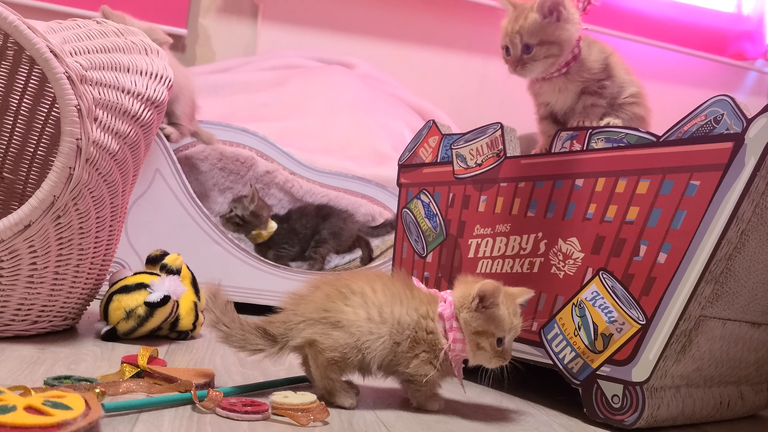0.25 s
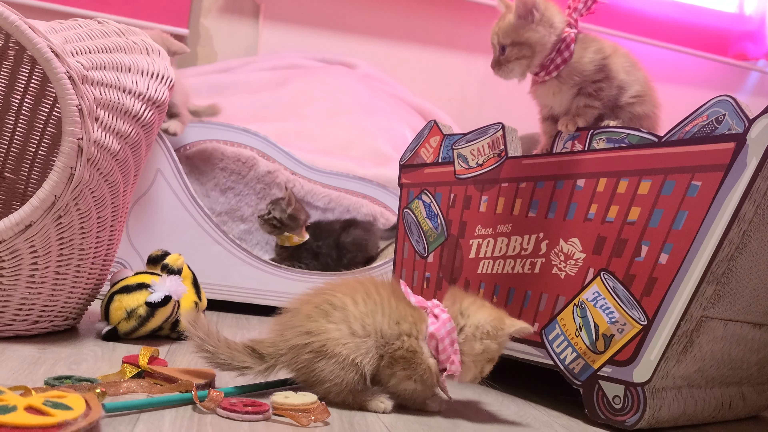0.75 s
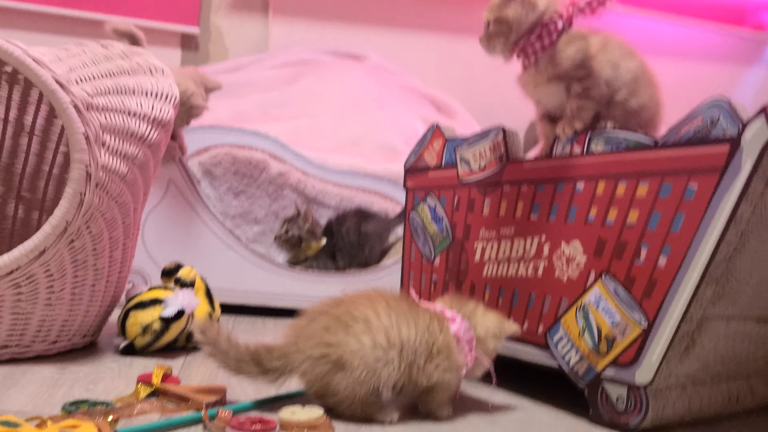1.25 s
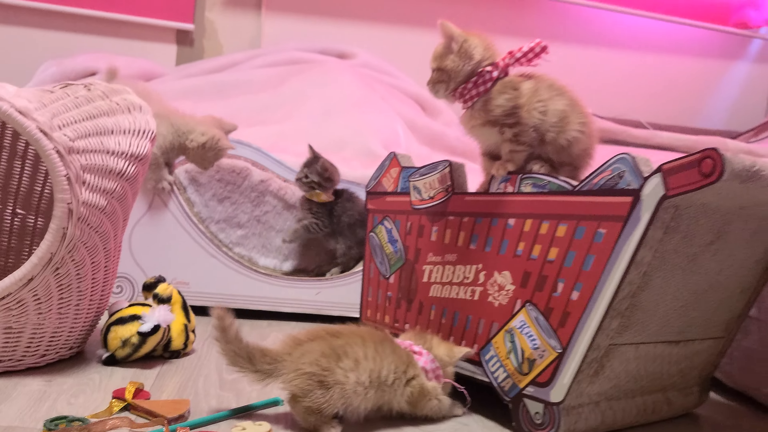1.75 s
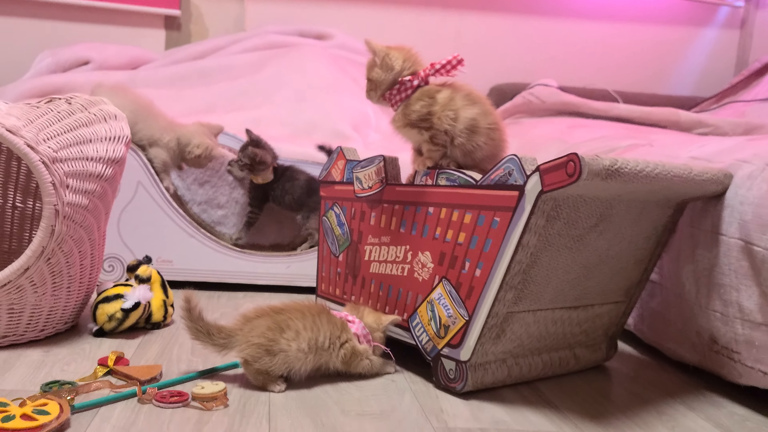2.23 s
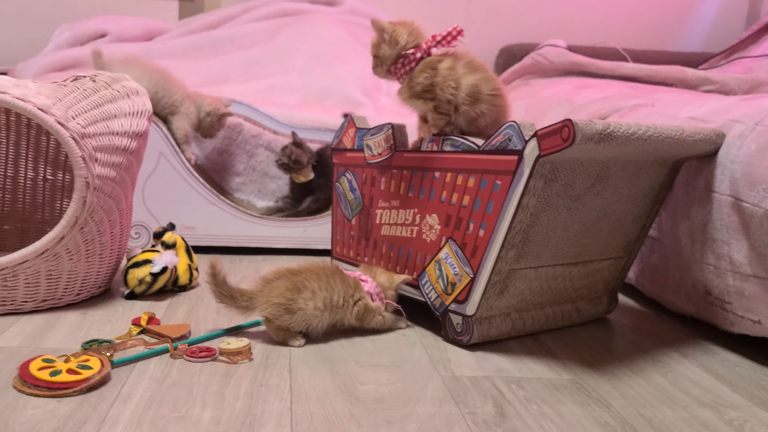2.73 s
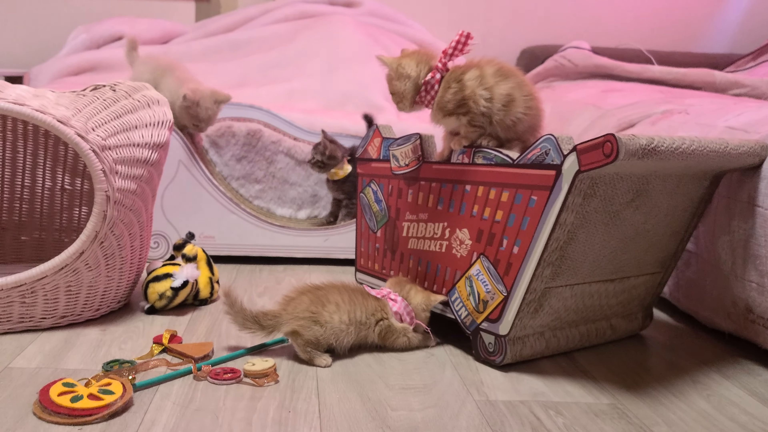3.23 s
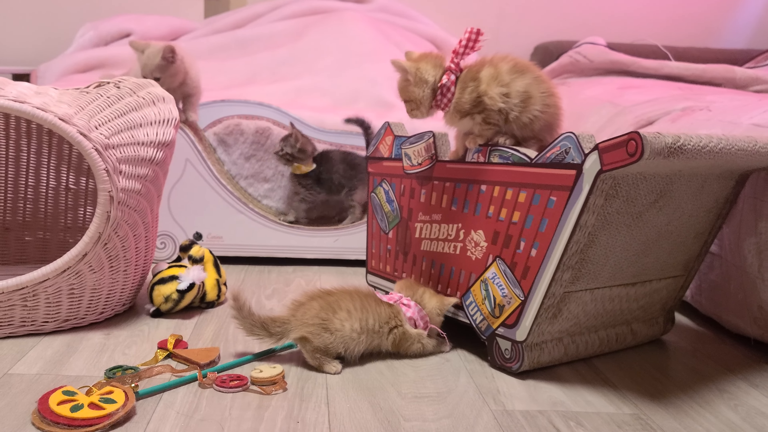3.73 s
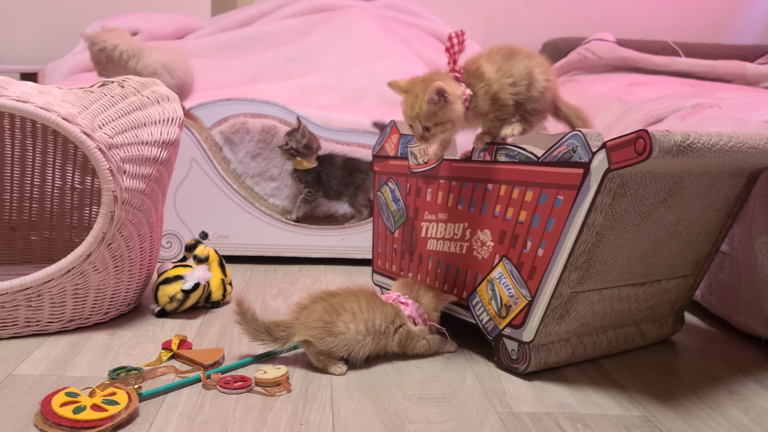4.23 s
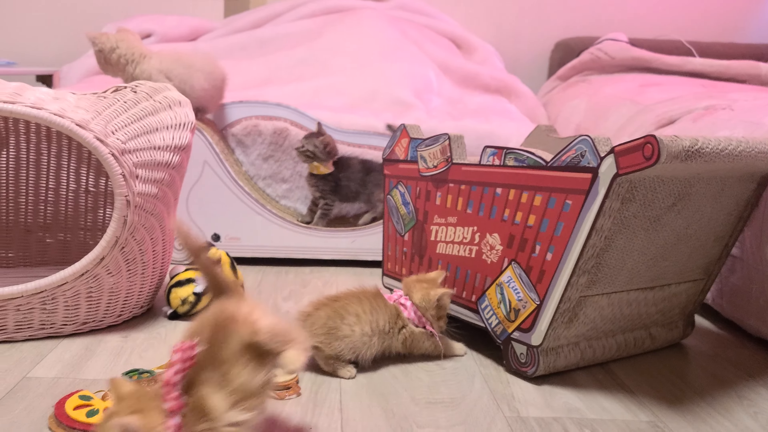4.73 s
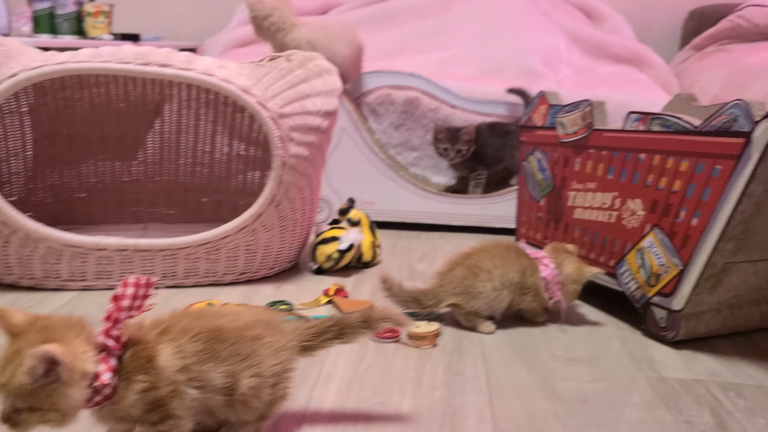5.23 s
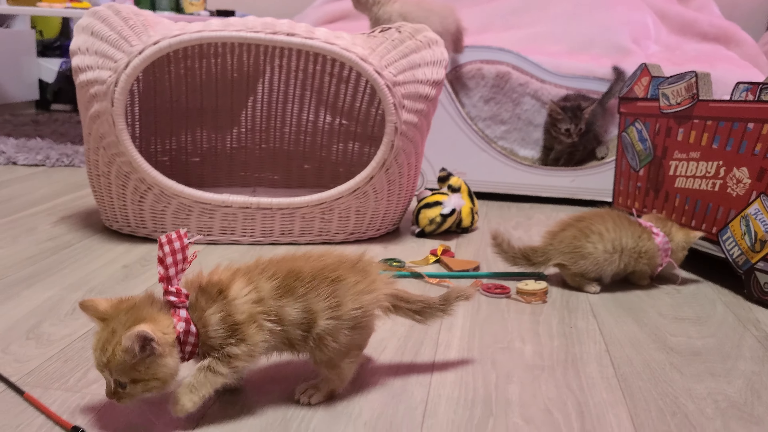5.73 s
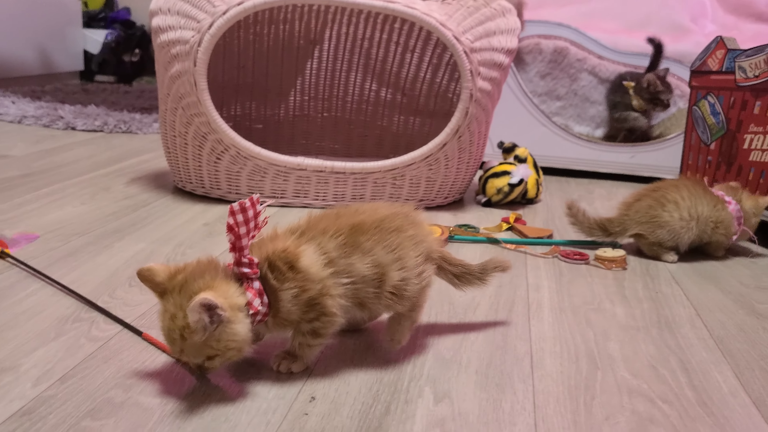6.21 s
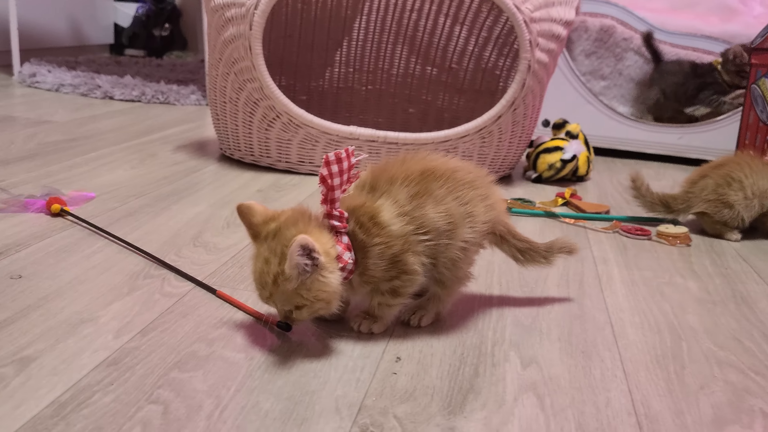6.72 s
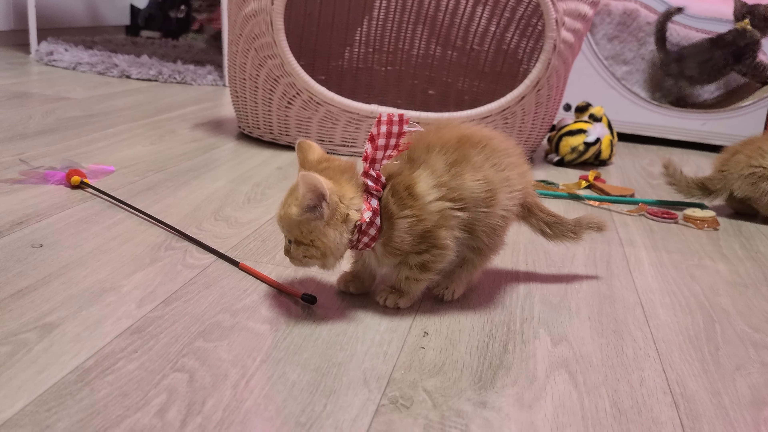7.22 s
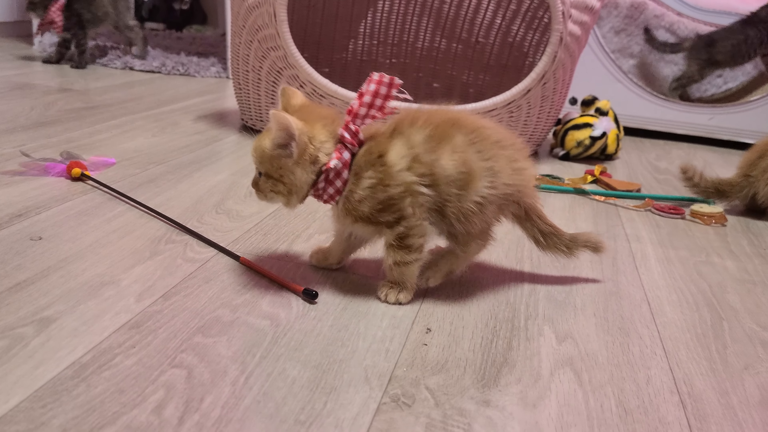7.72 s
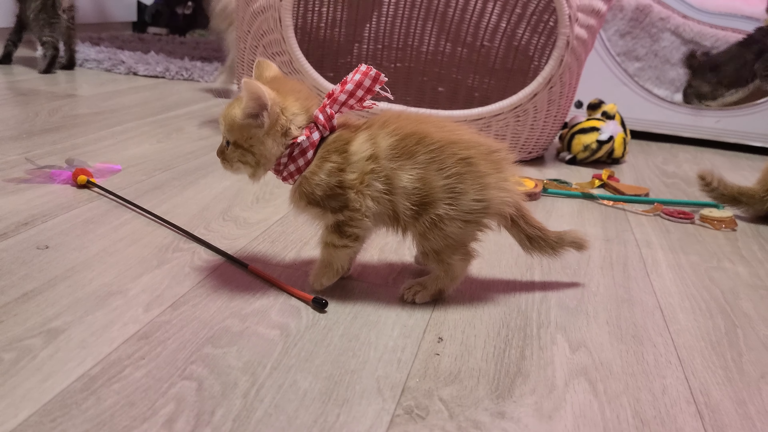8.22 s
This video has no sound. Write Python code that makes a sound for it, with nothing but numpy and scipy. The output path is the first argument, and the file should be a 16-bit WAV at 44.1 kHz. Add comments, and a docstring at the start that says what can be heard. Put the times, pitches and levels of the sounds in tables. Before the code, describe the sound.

A quiet indoor room with a faint, steady appliance hum and low rumble. From about 0.7 to 4 seconds, kittens' claws tick and scratch lightly on cardboard and wicker, mostly to the right. Close, dry handling noises reach the microphone almost only on the right: faint grip creaks early on, a loud knock at 1.5 seconds, a small finger judder at 2.7 and another knock at 3.3. Around 4.6 seconds a kitten lands on the wooden floor with a few soft thuds and toy clicks, and a small bell tinkles briefly and faintly at 4.8. From 6.1 to 6.8 seconds come four loud, sharp taps on the microphone's housing, with a light scratch among them, followed by quicker, weaker taps that fade by 7.6. Three quick, soft paw thumps on the boards arrive at about 8.3 seconds.

```python
"""Camera taps and kittens at play

Sharp taps on a hand-held camera's housing reach almost only its right microphone, by conduction.
Kittens play on a wooden floor: claws tick and rasp on a cardboard scratcher and wicker, one kitten
jumps down among toys and sets the boards swinging, and a small bell tinkles in its free modes.
A quiet appliance hums under the broadband noise of the room."""
import sys
import numpy as np
from scipy import signal
from scipy.fft import rfft, irfft, next_fast_len
from scipy.io import wavfile
from scipy.ndimage import map_coordinates

SR = 44100
rng = np.random.default_rng(int(sys.argv[2]) if len(sys.argv) > 2 else 0)


def log_audio(samples):
    """Write samples as a 16-bit WAV file to the path given in sys.argv[1]."""
    # one column per channel
    frames = np.atleast_2d(samples).T
    # limit to full scale, then quantise
    limited = np.clip(frames, -1, 1)
    pcm = np.round(limited * 32767).astype(np.int16)
    wavfile.write(sys.argv[1], SR, pcm)


N = 373086

# Transmission through the housing: f/Hz, level/dB
HOUSING_RESPONSE = [(40, -18), (110, -1.5), (210, 5.5), (480, 3.5), (1000, -5), (1700, -8.5), (2500, -15),
                    (3500, -15), (5500, -21), (16000, -14)]
def tap(sharp_hz, bass_share=.058):
    """Impact: a softer contact lasts longer, which lowers the cutoff sharp_hz of its pulse."""
    uneven = lambda hz: ripple(hz, spacing_hz=500) * np.minimum(hz / 2000, 1.5)
    bass_loss = lambda hz: np.hypot(1, bass_share * sharp_hz / (hz + 50))
    pulse = impulse(lambda hz: amp(along(HOUSING_RESPONSE, hz) + uneven(hz)) / bass_loss(hz))
    pulse = np.pad(pulse, (SR // 500, 0))  # 2 ms of room for the onset
    return peaked(filtered(pulse, lambda hz: 1 / np.sqrt(1 + (hz / sharp_hz) ** 5)))


# A finger juddering on the housing: t/s, level/dB, slip period/s
FINGER_JUDDERS = [(1.051, -41, .0158), (2.7132, -25.5, .0138)]
def judders(spread_s=.001, spread_db=2.5, sharp_hz=680, ring_db=-19.5):
    """Stick-slip: each judder yields four soft, nearly evenly spaced contacts."""
    return [(s + k * gap + spread_s * late, db + spread_db * size, sharp_hz, ring_db)
            for s, db, gap in FINGER_JUDDERS
            for k, (late, size) in enumerate(rng.uniform(-1.1, 1, (4, 2)))]


# Taps on the housing, and two soft paw bumps at 1.87 s and 2.45 s: t/s, level/dB, contact cutoff f/Hz, relative
# ring level/dB
HOUSING_TAPS = [(1.1574, -27, 7000, -9.5), (1.5034, -5, 1340, -6.5), (1.8737, -40, 700, -28),
                (2.4455, -41, 700, -30), (3.2562, -11, 1130, -25), (6.0666, -6, 3080, -13),
                (6.224, -5.5, 2980, -18), (6.341, -5.5, 3300, -13.5), (6.8143, -6, 3030, -11.5),
                (6.956, -15, 3760, -16.5), (7.0354, -17.5, 4900, -16), (7.158, -16, 7260, -17),
                (7.1943, -29, 1820, -28), (7.298, -18, 6150, -26), (7.534, -35, 4130, -12),
                (7.5384, -25, 3130, -16), (7.6397, -30, 6900, -30)]
# High resonances of the housing: f/Hz, level/dB
RING_SPECTRUM = [(1500, -20.5), (2700, -5.5), (3500, -4), (5500, -28), (7000, -11), (9500, -11.5),
                 (11000, -7.5), (11900, 1), (13000, -13.5), (15500, -15)]
def housing(ring_t60=.0057, settle_t60=.05, lead_in_db=-21, settle_db=-25, creak_db=-52, leak_db=-48):
    """Structure-borne sound: each tap reaches the right microphone as the housing rings and settles."""
    out = np.zeros(N)
    ring = lambda hz: amp(along(RING_SPECTRUM, hz))
    for s, db, sharp_hz, ring_db in HOUSING_TAPS + judders():
        muffled = lambda hz: amp(along(HOUSING_RESPONSE, hz)) / (1 + (hz / sharp_hz) ** 2)
        add(out, s - 1 / 500, amp(db) * tap(sharp_hz))
        add(out, s, amp(db + ring_db + 1) * burst(ring, ring_t60)[0])
        # a faint, muffled lead-in just before each tap
        add(out, s - .00126, amp(db + lead_in_db) * burst(muffled, ring_t60)[0])
        add(out, s, amp(db + settle_db) * burst(muffled, settle_t60)[0])
    creak = tap(sharp_hz=680)
    for when, size in rng.random((45, 2)):  # the grip creaks faintly for the first 2.7 s
        add(out, 2.7 * when, amp(creak_db + 3.34 * size) * creak)
    return out * amp([[leak_db], [0]])


# Claw ticks and toy clicks: t/s, level/dB, f/Hz, left minus right/dB, T60/s
CLAW_TICKS = [(.724, -52, 5030, -7, 0.0099), (0.8656, -41.5, 1420, -1.5, 0.062),
              (1.1, -36, 5770, -11, .018), (1.156, -23, 2060, -24, 0.0037), (1.188, -31.5, 5520, -7, .02),
              (1.565, -38.5, 5660, -16, 0.041), (1.576, -34.5, 5800, -15, 0.013),
              (1.612, -38.5, 6170, -12, 0.012), (1.659, -36.5, 5500, -17, 0.016),
              (1.797, -42, 5700, -11, 0.086), (1.9205, -42, 4500, -3, 0.024),
              (1.96, -31.5, 6700, -10, .022), (2.184, -45, 5550, -9, 0.013), (3.32, -35, 3130, -4, 0.038),
              (3.411, -33.5, 4400, -7, 0.031), (3.439, -44, 5950, -10, 0.017),
              (3.534, -36.5, 2170, -3, .045), (3.6, -36.5, 5300, -15, 0.025),
              (3.774, -44.5, 5500, -20, 0.031), (3.819, -38.5, 2950, 0, 0.02),
              (3.944, -46, 5500, -11, 0.053), (3.995, -40.5, 5340, -7, 0.061),
              (4.028, -31.5, 5700, -2.5, 0.0052), (4.425, -46, 4110, -16, 0.055),
              (4.454, -34, 3370, -9, 0.031), (4.588, -38.5, 3100, -13, 0.022),
              (4.6926, -22.5, 4620, -5, 0.0065), (4.696, -38, 2200, 10, 0.01),
              (4.717, -29, 3840, -13, 0.016), (4.72, -33.5, 2250, -14, 0.024)]
# Spectral envelope of a tick: f/Hz, level/dB
TICK_SPECTRUM = [(300, 0.5), (1200, 3.5), (3000, -2.5), (6300, 2.5), (8000, -14.5), (12500, -19.5),
                 (16000, -16)]
def claws(level_db=-2, hump_db=7, ripple_db=4.5, ring_t60=.076):
    """Plucking: a spot caught and released radiates little far below its pitch and rings on hollowly."""
    out = np.zeros((2, N))
    for s, db, pitch_hz, pan_db, t60 in CLAW_TICKS + catches():
        ring_db = -15.5 + 8 * np.log2(t60 / .018)  # a freer spot rings more
        ring = amp(ring_db) * burst(lambda hz: resonance(hz, pitch_hz, width=.17), ring_t60)
        hump = lambda hz: hump_db * resonance(hz, pitch_hz, width=.11)
        spot = lambda hz: hump(hz) + ripple_db * ripple(hz, spacing_hz=263)
        bass_loss = lambda hz: 1 + (.33 * pitch_hz / (hz + 1)) ** 2
        tick = burst(lambda hz: amp(along(TICK_SPECTRUM, hz) + spot(hz)) / bass_loss(hz), t60)
        add(out, s, amp(db + level_db) * panned(pan_db) * (tick + ring))
    return out


# Claws and fur dragged over cardboard: hardest pull t/s, swell/s, hiss level/dB, rasp level/dB
SCRATCH_STROKES = [(.22, 0.045, -70, -77), (0.729, 0.048, -64.5, -70), (.872, .008, -56.5, -72),
                   (1.161, .068, -49.5, -59.5), (1.57, 0.0949, -53.5, -57.5), (1.922, 0.0022, -44.5, -82),
                   (1.965, .005, -55, -82), (2.31, 0.17, -60.5, -66.5), (2.661, 0.041, -56.5, -59.5),
                   (3.445, 0.035, -51.5, -63), (3.826, 0.011, -53, -52), (4.03, 0.0044, -51, -75),
                   (4.722, 0.024, -71, -44), (4.81, 0.061, -52.5, -80), (6.535, 0.064, -48, -61.5),
                   (7.64, 0.096, -67.5, -65.5)]
# Spectral densities of the high hiss and the lower rasp: f/Hz, level/dB
HISS_SPECTRUM = [(1000, -83), (2000, -36.5), (3500, -9), (5000, -0.5), (6300, 5), (8000, -8.5),
                 (10000, -7.5), (12200, -8), (14000, -24), (16000, -27.5)]
RASP_SPECTRUM = [(150, -56), (600, -25.5), (1200, 12), (2100, 8.5), (3300, 7.5), (5000, -19), (10000, -50)]
GRIP_PER_SWELL = .5  # a stroke first takes hold for this share of its swell
def scratching(hiss_db=-3, rasp_db=-5, grain_db=3, dull_below_db=-49, dull_hz=6500):
    """Friction noise: dragged claws jerk from fibre to fibre, and each stroke meets other resonances."""
    out = np.zeros((2, N))
    jerks = unit(amp(grain_db * wobble(500) + wobble(43)))
    hiss = jerks * noise(HISS_SPECTRUM) * panned(db=-13)
    rasp = jerks * noise(RASP_SPECTRUM) * panned(db=.5)
    for s, swell, high_db, low_db in SCRATCH_STROKES:
        start = max(round((s - swell - GRIP_PER_SWELL * swell) * SR), 0)
        i = np.arange(start, round(s * SR) + SR // 3)
        friction = amp(hiss_db + high_db) * hiss[:, i] + amp(rasp_db + low_db) * rasp[:, i]
        drag = pull(i / SR - s, swell) * friction
        dull_db = .7 * min(high_db - dull_below_db, 0)  # a weak stroke loses treble
        drag = filtered(drag, lambda hz: amp(dull_db * np.clip(hz / dull_hz - 1, 0, 1) ** .5))
        add(out, start / SR, filtered(drag, lambda hz: amp(1.6 * ripple(hz, spacing_hz=150))))
    return out


def pull(t, swell, swell_db=9):
    """Amplitude envelope: a stroke grips, grows exponentially to its hardest pull at t = 0, and decays."""
    grip = np.clip((t + swell) / (GRIP_PER_SWELL * swell) + 1, 0, 1) ** 2
    release_s = .055 + .43 * swell  # a slow stroke also lets go slowly
    return grip * amp(np.minimum(swell_db * t / swell, -20 * t / release_s))


def catches(centre_hz=5110, pan_db=-12, t60=.012):
    """Snagging: each stroke ticks twice near its hardest pull, the louder the more it hisses."""
    return [(s + swell * when / 2, hiss_db + 6 + 3 * size, centre_hz * (1 + .25 * pitch), pan_db, t60)
            for s, swell, hiss_db, _ in SCRATCH_STROKES
            for when, size, pitch in rng.uniform(-1, 1, (2, 3))]


# Paws landing: t/s, knock level/dB, thud level/dB, knock f/Hz
PAW_LANDINGS = [(1.078, -44, -46, 300), (4.594, -29, -34, 547), (4.728, -40, -40.5, 286),
                (4.801, -36, -40.5, 445), (6.48, -47, -57, 434), (6.585, -52, -43, 400),
                (8.24, -30, -33.5, 400), (8.264, -32, -33, 374), (8.276, -28.5, -33.5, 366)]
# Modes of the floorboards: f/Hz, level/dB, T60/s
BOARD_MODES = [(74, -0.5, 0.091), (128.5, -3.5, .11), (192, -8.5, 0.082)]
# Spectral envelope of a knock on wood: f/Hz, level/dB
KNOCK_SPECTRUM = [(30, -8), (90, -1.5), (220, -0.5), (500, 0.5), (700, -2.5), (1000, -8.5), (1400, -11),
                  (2000, -16.5), (2600, -30.5), (5000, -20.5), (12000, -44.5)]
def paws(toe_db=1, heel_db=-6.5, heel_s=.01, hump_db=9, knock_t60=.048, rise_s=.0064):
    """Impact on a plate: the toes knock, then the weight follows and drives the boards' damped modes."""
    def knock(pitch_hz):
        hump = lambda hz: hump_db * resonance(hz, pitch_hz, width=.12)
        return burst(lambda hz: amp(along(KNOCK_SPECTRUM, hz) + hump(hz)), knock_t60)

    out, t = np.zeros((2, N)), np.arange(SR // 3) / SR
    loading = (1 - np.exp(-t / rise_s)) ** 2
    for s, db, thud_db, pitch_hz in PAW_LANDINGS:
        swing = sum(amp(level - 60 * t / t60) * np.sin(2 * np.pi * (hz * t + rng.random()))
                    for hz, level, t60 in BOARD_MODES)
        add(out, s, amp(db + toe_db) * knock(pitch_hz))
        add(out, s + heel_s, amp(db + heel_db) * knock(.8 * pitch_hz))
        add(out, s + heel_s, amp(thud_db) * peaked(swing * loading))
    return out


# Strikes of the bell's pellet: t/s, level/dB
PELLET_STRIKES = [(4.777, -50), (4.788, -37), (4.828, -45.5)]
# Modes of its shell: f/Hz, level/dB, T60/s
SHELL_MODES = [(7330, -11.5, 0.12), (7910, -25, .16), (7910, -4, 0.075), (9900, -22, .08)]
def bell():
    """Free vibration: the pellet strikes the shell, whose modes decay exponentially."""
    out, t = np.zeros((2, N)), np.arange(SR // 3) / SR
    for s, db in PELLET_STRIKES:
        for hz, level, t60 in SHELL_MODES:
            mode = np.sin(2 * np.pi * (hz * t + rng.random((2, 1))))
            add(out, s, amp(db + level - 60 * t / t60) * mode)
    return out


# Reverberation time of the room: f/Hz, T60/s
ROOM_DECAY = [(150, 0.12), (1500, 0.28), (6000, 0.33), (14000, 0.25)]
def room(x):
    """Reverberation: wall reflections merge into a short diffuse tail that dies fastest in the bass."""
    hz, _, spectra = signal.stft(rng.standard_normal((2, SR // 2)), SR, nperseg=256)
    t = np.arange(spectra.shape[-1]) * 128 / SR
    tail = signal.istft(spectra * amp(-60 * t / along(ROOM_DECAY, hz)[:, None]), SR, nperseg=256)[1]
    delayed = np.pad(x, ((0, 0), (200, 0)))
    return signal.fftconvolve(delayed, tail / np.linalg.norm(tail[0]), axes=1)[:, :N]


# Spectral densities of three bands of room noise: f/Hz, level/dB
LOW_SPECTRUM = [(30, -24), (150, -3.5), (230, -5), (265, 3.5), (310, -2.5), (365, 0), (450, -3),
                (500, -12.5), (650, -16.5), (1000, -25), (3000, -25), (8000, -100)]
MID_SPECTRUM = [(60, -48), (250, -31), (450, 0.5), (580, 1), (720, 0), (850, 1), (1000, -4.5), (1350, -7.5),
                (1600, -7.5), (2100, -14), (3500, -20.5), (7000, -80), (12000, -94)]
HIGH_SPECTRUM = [(1000, 2), (2500, -1), (4500, 4.5), (5600, 6.5), (6800, 9.5), (7600, 0.5), (8500, -11),
                 (10000, -9.5), (12000, -6), (16000, -14)]
# Envelopes of the low and middle bands: t/s, level/dB
LOW_ENVELOPE = [(0.0, -65.5), (0.54, -63), (2.97, -69.5), (8.1, -66.5), (8.46, -64.5)]
MID_ENVELOPE = [(0, -71), (1.4, -70), (3.2, -64.5), (4.4, -66.5), (5.0, -63.5), (5.8, -64.5), (6.899, -69),
                (7.448, -66.5), (8.46, -67)]
def air(lift_db=1, high_db=-73.5, ripple_db=1.52):
    """Ambient noise: the balance of its bands, and so its colour, shifts as the camera turns."""
    t = np.arange(N) / SR
    gain = lambda envelope: amp(lift_db + np.interp(t, *np.transpose(envelope)))
    low = gain(LOW_ENVELOPE) * noise(LOW_SPECTRUM) * panned(db=-2)
    mid = gain(MID_ENVELOPE) * noise(MID_SPECTRUM)
    high = amp(high_db) * noise(HIGH_SPECTRUM) * panned(db=-6)
    return filtered(low + mid + high, lambda hz: amp(ripple_db * ripple(hz, spacing_hz=45.27)))


# Tones of the appliance: f/Hz, rms level/dB
HUM_TONES = [(86, -61), (181, -69.5)]
def appliance(flutter_db=.89, drift_rad=.88):
    """Random modulation: two humming tones waver slightly in amplitude and phase."""
    t = np.arange(N) / SR
    tones = (amp(db + flutter_db * wobble(32)) * np.sin(2 * np.pi * hz * t + drift_rad * wobble(6))
             for hz, db in HUM_TONES)
    return np.sqrt(2) * sum(tones)


# Spectral density of the room's rumble: f/Hz, level/dB
RUMBLE_SPECTRUM = [(20, -11), (32, -9), (48, 7), (65, -4.5), (86, 2.5), (110, -3), (148, -8), (180, 2.5),
                   (215, -7.5), (400, -40.5), (2000, -100)]
def rumble(level_db=-60):
    """Stationary noise: a faint, steady bass lies under everything."""
    return amp(level_db) * noise(RUMBLE_SPECTRUM)


# Likeness of left and right: f/Hz, correlation coefficient
COHERENCE = [(60, 0.85), (180, 0.9), (550, 0.69), (1650, 0.0), (4970, 0.052), (15000, 0.019)]
def noise(spectrum):
    """Partial coherence: stereo noise, alike in the bass and unrelated in the treble; mid rms is 1."""
    def response(hz):
        turn = np.arccos(np.clip(along(COHERENCE, hz), -1, 1)) / 2
        return amp(along(spectrum, hz)) * [np.cos(turn), np.sin(turn)]

    mid, side = filtered(rng.standard_normal((2, N)), response)
    return np.array([mid + side, mid - side]) / mid.std()


def burst(body, t60):
    """Source and filter: decaying stereo contact noise, coloured by a body; peak 1."""
    t = np.arange(SR // 10) / SR
    contact = rng.standard_normal((2, len(t))) * amp(-60 * t / t60)
    sound = signal.fftconvolve(contact, impulse(body)[None], axes=1)
    return sound / np.abs(sound).max(axis=1, keepdims=True)


def impulse(response, size=4096):
    """Minimum phase: the causal impulse response for a given gain against frequency."""
    gain = np.maximum(response(np.fft.rfftfreq(size, 1 / SR)), 1e-6)
    cepstrum = irfft(np.log(gain))
    cepstrum[1:size // 2] *= 2
    cepstrum[size // 2 + 1:] = 0
    return irfft(np.exp(rfft(cepstrum)))


def filtered(x, response):
    """Zero-phase filtering: the spectrum of x times a response of frequency."""
    n = x.shape[-1]
    m = next_fast_len(n + 8192)
    return irfft(rfft(x, m) * response(np.fft.rfftfreq(m, 1 / SR)), m)[..., :n]


def resonance(hz, centre_hz, width):
    """Lorentzian peak of height 1; width is its half-width as a share of its centre."""
    return 1 / (1 + ((hz / centre_hz - 1) / width) ** 2)


def ripple(hz, spacing_hz):
    """Interference: close resonances and reflections leave random peaks and dips along frequency."""
    return map_coordinates(rng.standard_normal(2048), [hz / spacing_hz], mode="mirror")


def wobble(rate):
    """Smooth random modulation with rate knots a second."""
    return map_coordinates(rng.standard_normal(int(N * rate / SR) + 4), [np.arange(N) * rate / SR])


def along(points, hz):
    """Interpolation of (f/Hz, value) points on a logarithmic frequency axis."""
    f, v = np.transpose(points)
    return np.interp(np.log(hz + 1), np.log(f + 1), v)


def add(track, s, sound):
    """Superposition of a sound on a track at time s."""
    part = track[..., round(s * SR):][..., :sound.shape[-1]]
    part += sound[..., :part.shape[-1]]


def panned(db):
    """Level difference, left minus right, as two gains with mean 1."""
    gains = amp([[db / 2], [-db / 2]])
    return gains / gains.mean()


def amp(db):
    """Decibels to amplitude ratio."""
    return 10 ** (np.asarray(db) / 20)


def unit(x):
    """Normalisation to rms 1."""
    return x / np.sqrt(np.mean(x ** 2) + 1e-20)


def peaked(x):
    """Normalisation to peak 1."""
    return x / np.abs(x).max()


def scene():
    """Direct and diffuse fields add: ticks, bell and paws reverberate, while the rest stays dry."""
    ticks, steps = claws() + bell(), paws()
    reflections = room(amp(-6.5) * ticks + amp(-14) * steps)
    return ticks + steps + reflections + scratching() + housing() + air() + appliance() + rumble()


def record(dry, top_hz=16100, edge_hz=500):
    """Band limiting: the camera's response falls to zero across a narrow edge around top_hz."""
    return filtered(dry, lambda hz: np.clip((top_hz - hz) / edge_hz + .5, 0, 1))


dry = scene()
out = record(dry)
log_audio(out)
```